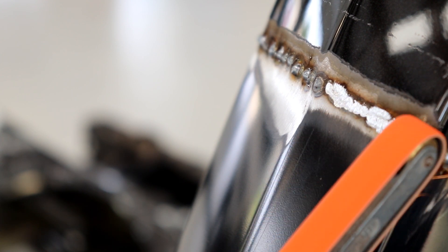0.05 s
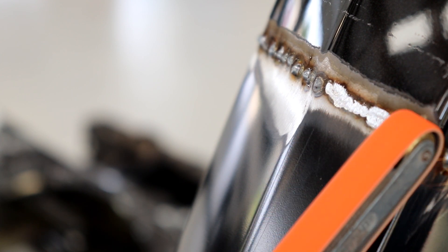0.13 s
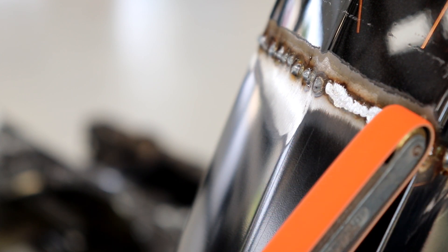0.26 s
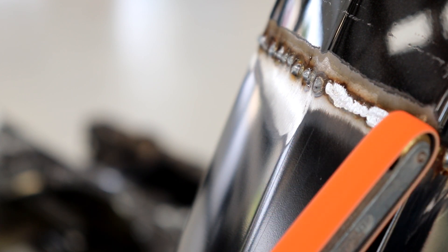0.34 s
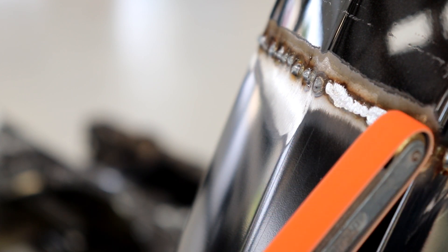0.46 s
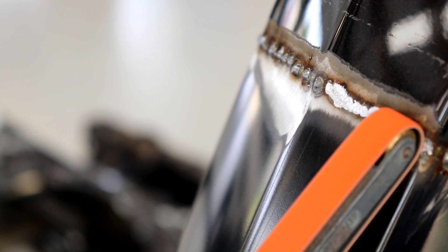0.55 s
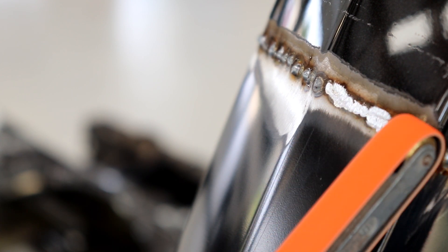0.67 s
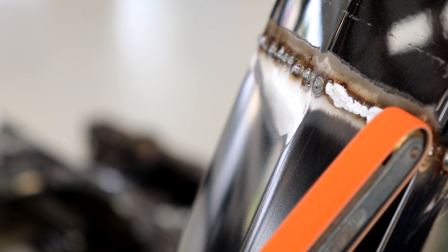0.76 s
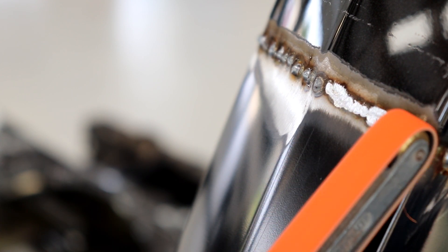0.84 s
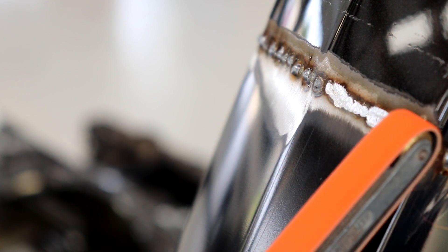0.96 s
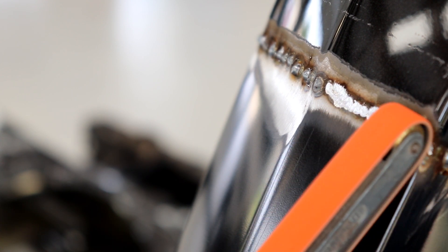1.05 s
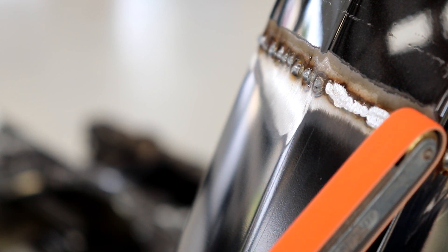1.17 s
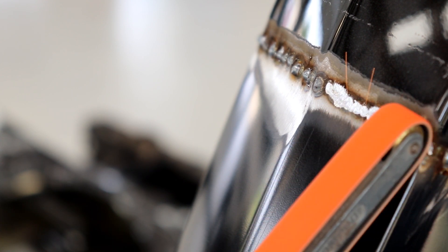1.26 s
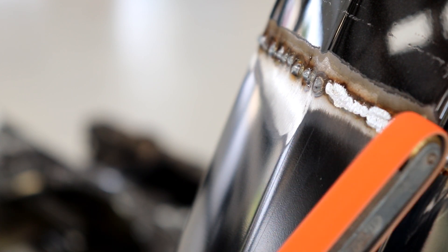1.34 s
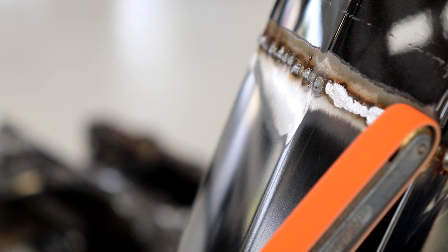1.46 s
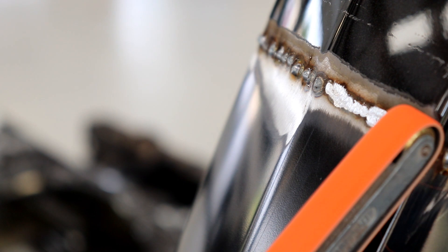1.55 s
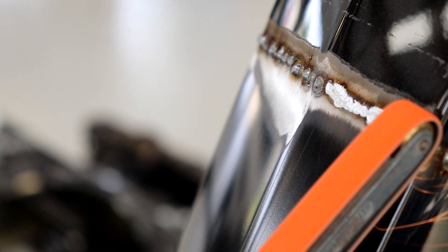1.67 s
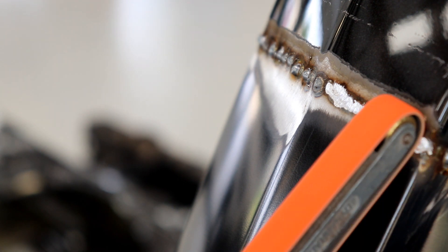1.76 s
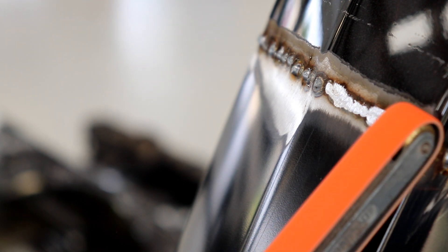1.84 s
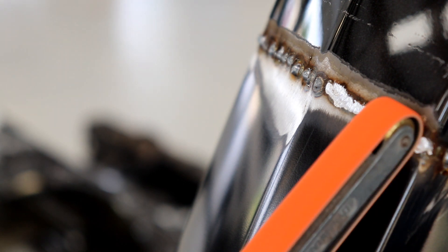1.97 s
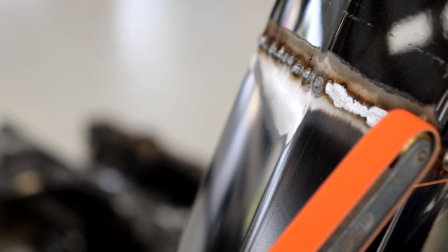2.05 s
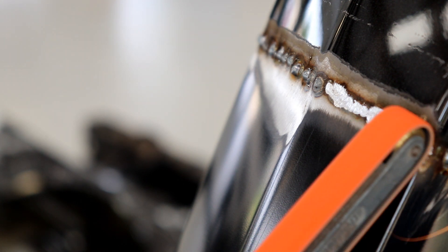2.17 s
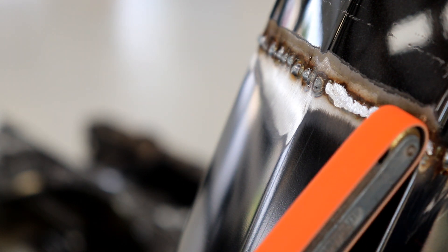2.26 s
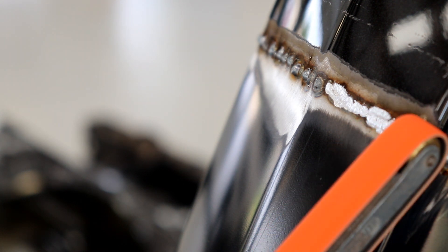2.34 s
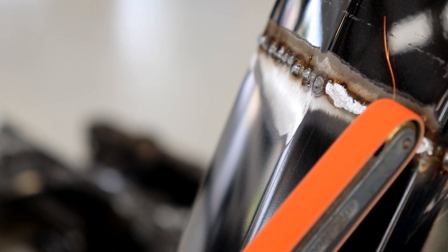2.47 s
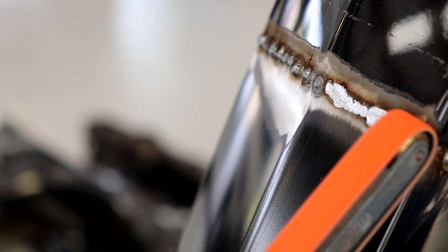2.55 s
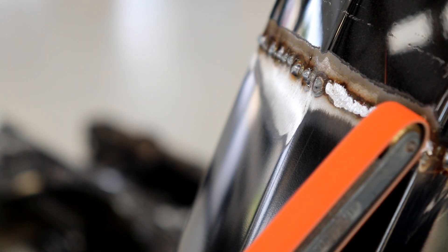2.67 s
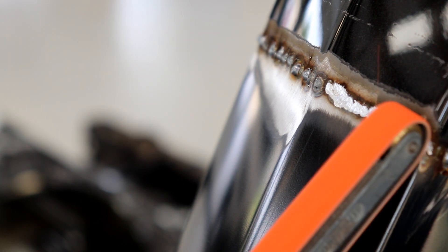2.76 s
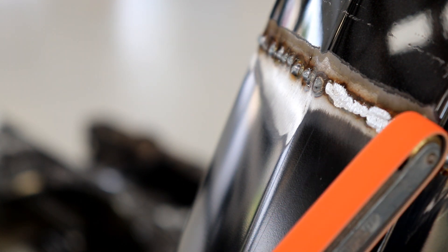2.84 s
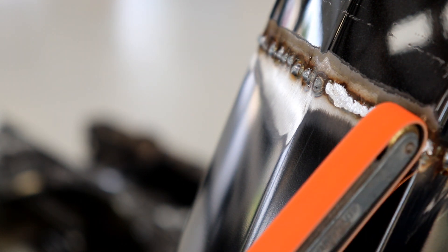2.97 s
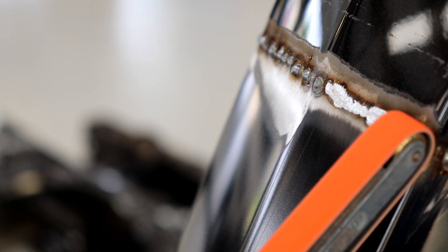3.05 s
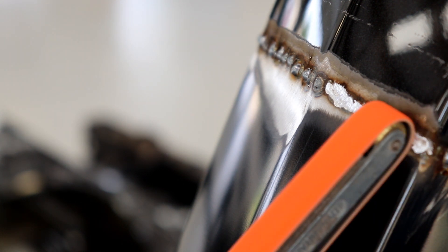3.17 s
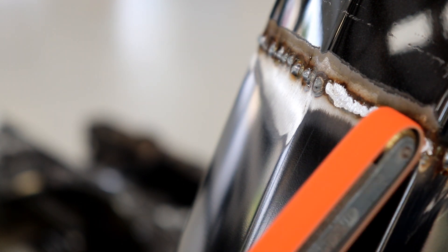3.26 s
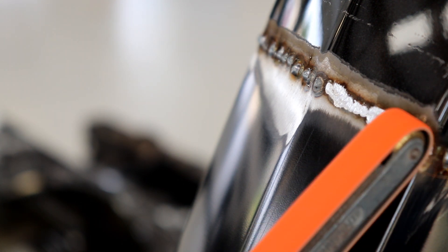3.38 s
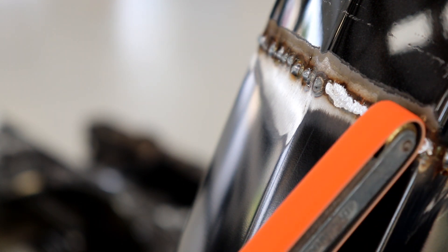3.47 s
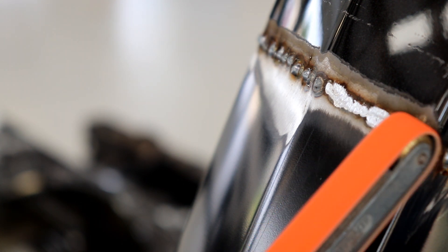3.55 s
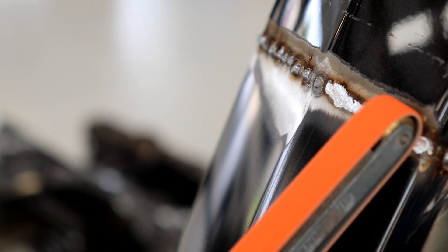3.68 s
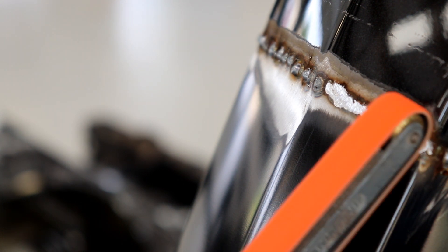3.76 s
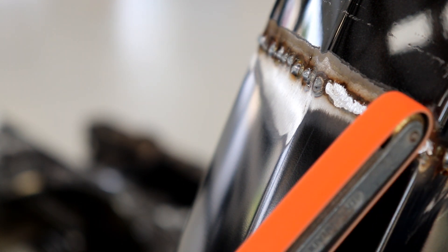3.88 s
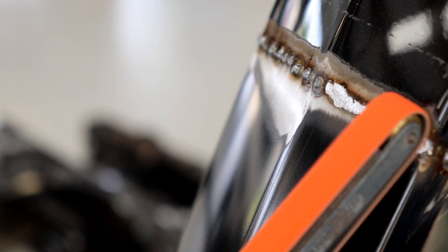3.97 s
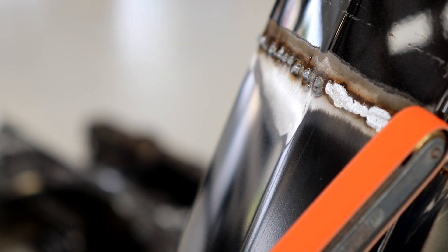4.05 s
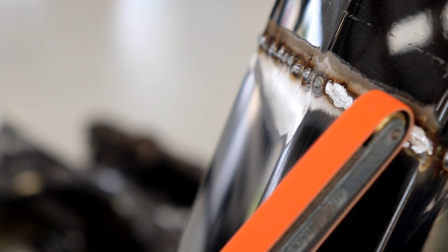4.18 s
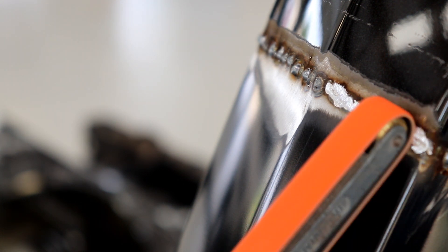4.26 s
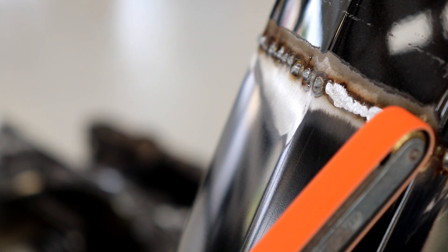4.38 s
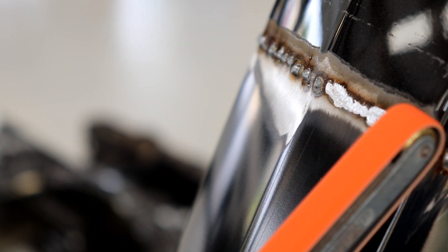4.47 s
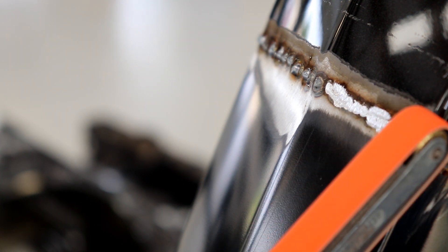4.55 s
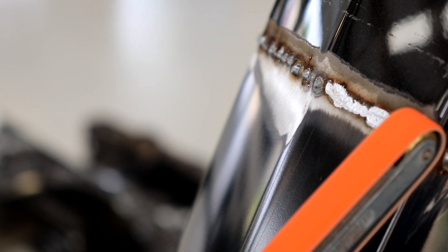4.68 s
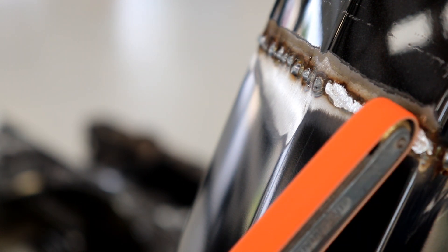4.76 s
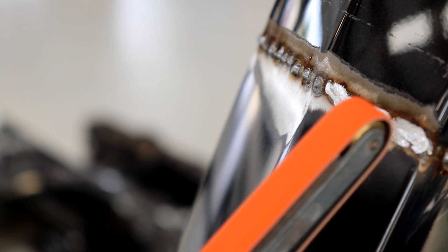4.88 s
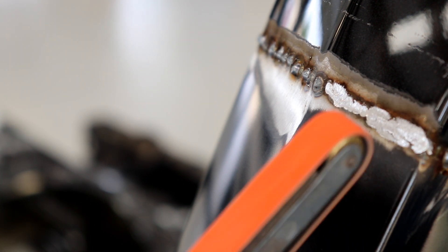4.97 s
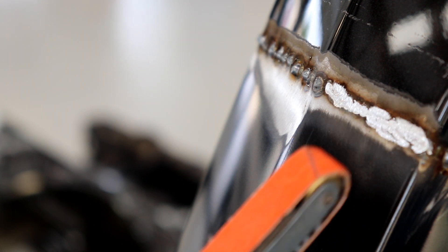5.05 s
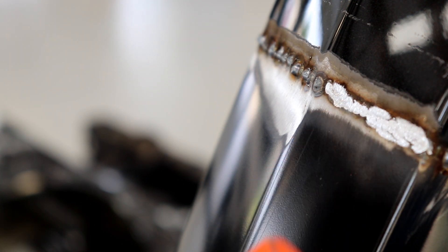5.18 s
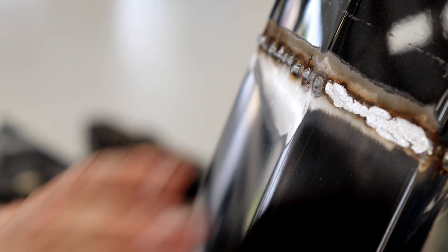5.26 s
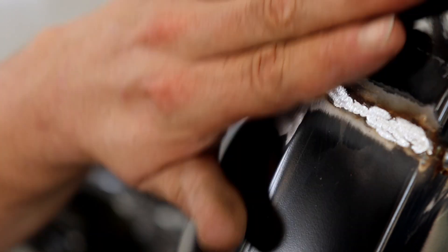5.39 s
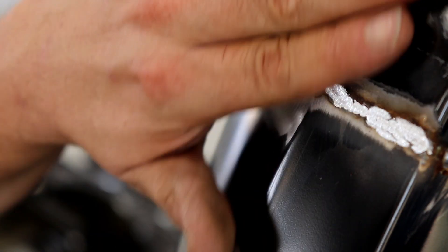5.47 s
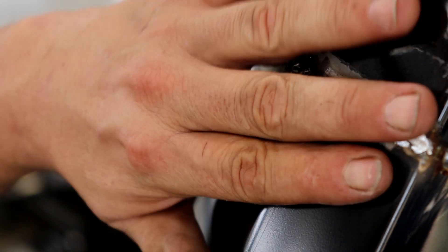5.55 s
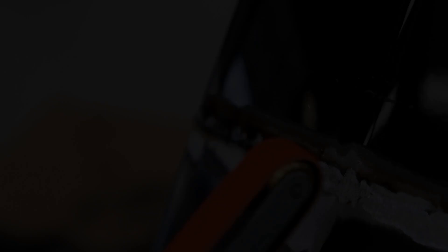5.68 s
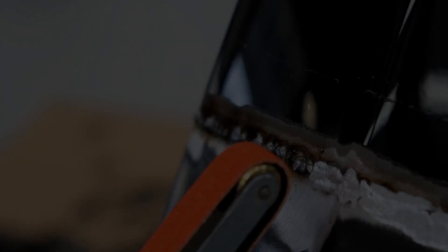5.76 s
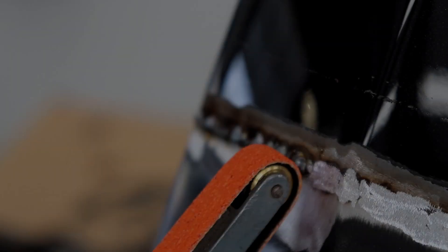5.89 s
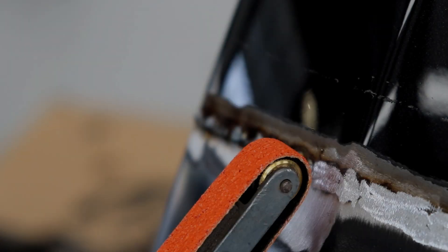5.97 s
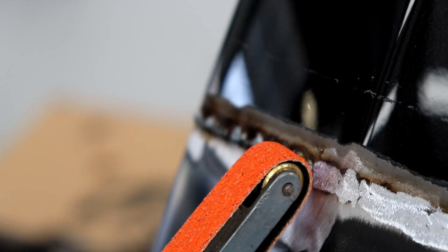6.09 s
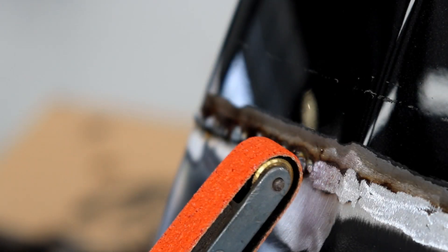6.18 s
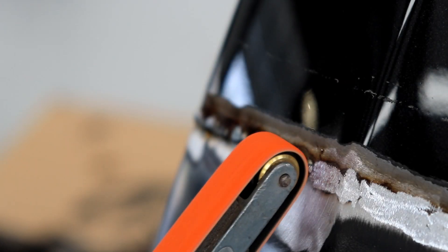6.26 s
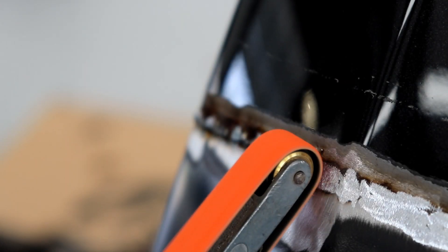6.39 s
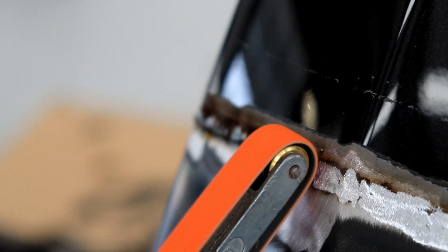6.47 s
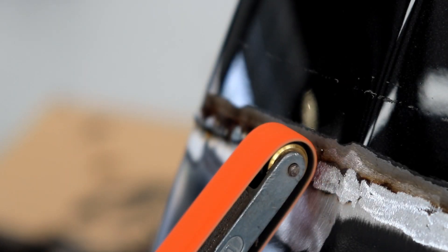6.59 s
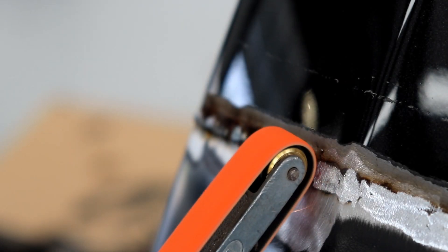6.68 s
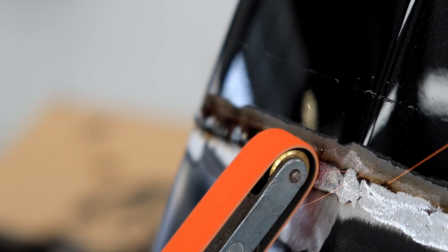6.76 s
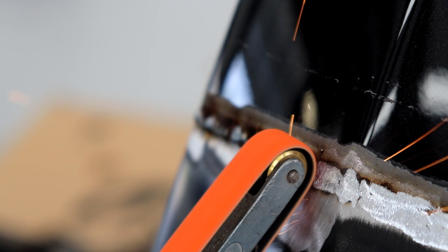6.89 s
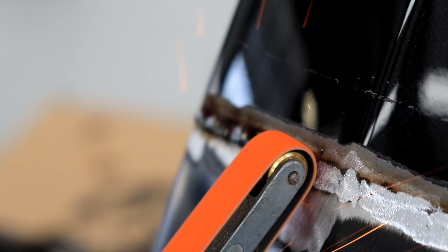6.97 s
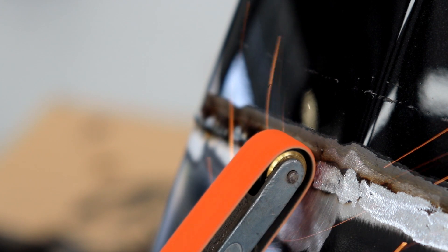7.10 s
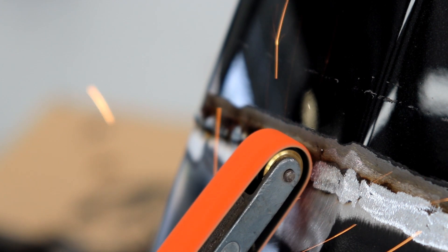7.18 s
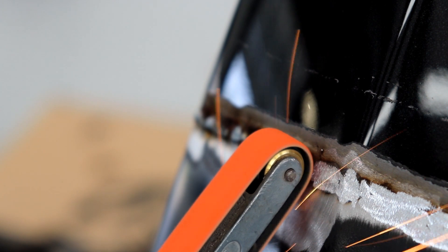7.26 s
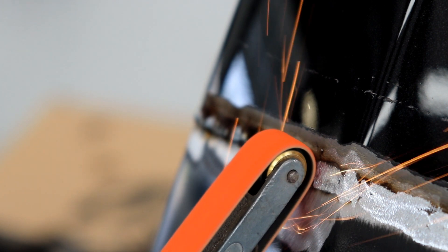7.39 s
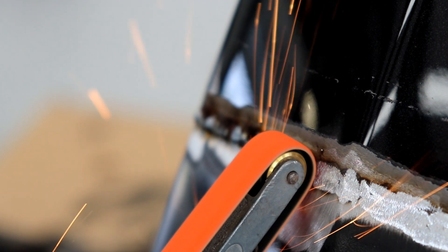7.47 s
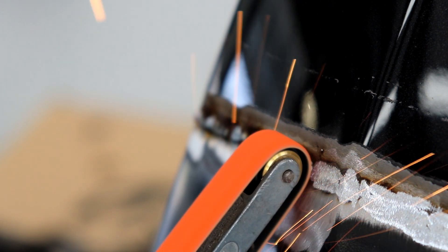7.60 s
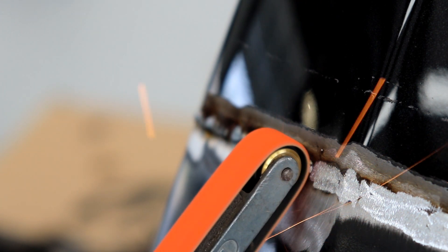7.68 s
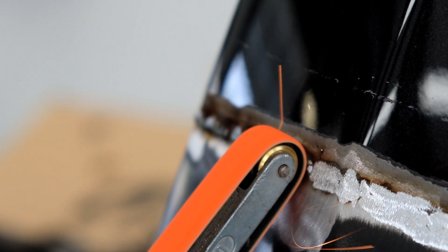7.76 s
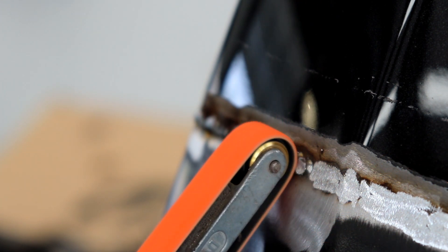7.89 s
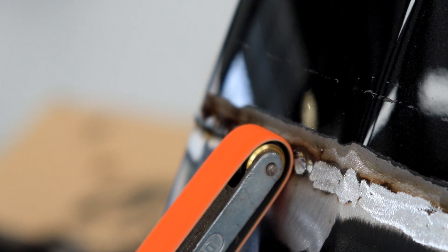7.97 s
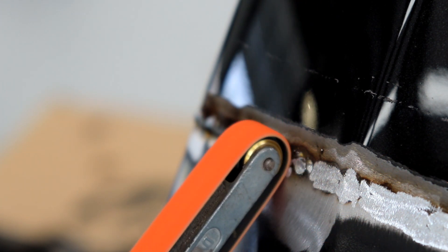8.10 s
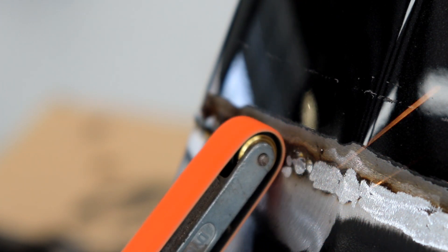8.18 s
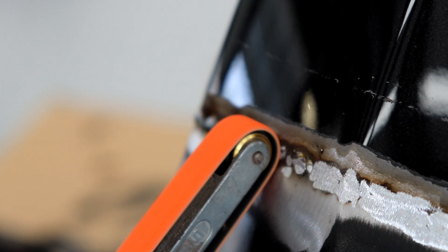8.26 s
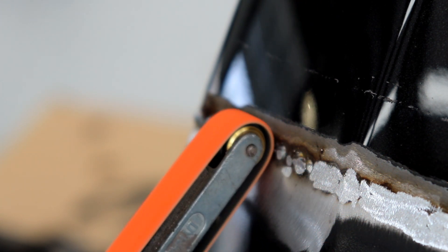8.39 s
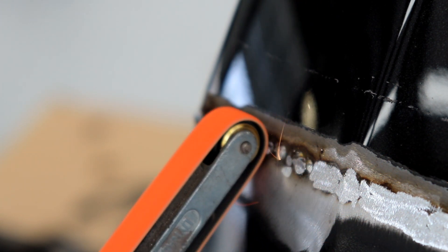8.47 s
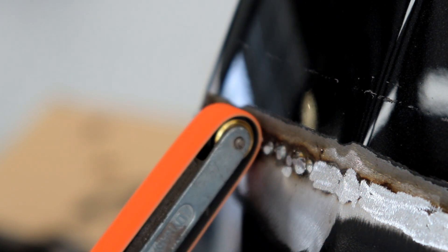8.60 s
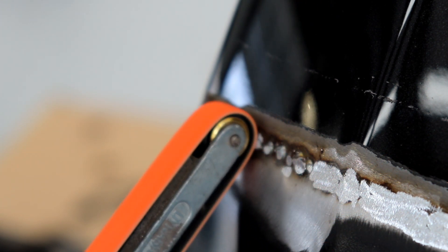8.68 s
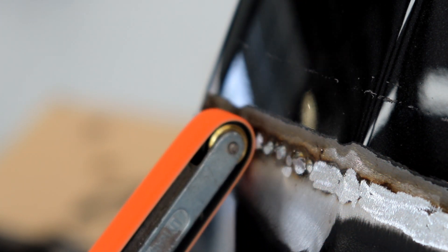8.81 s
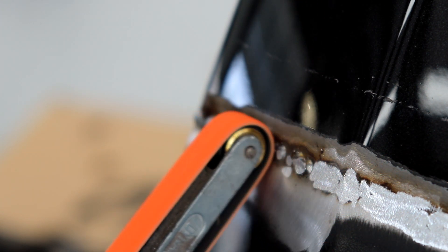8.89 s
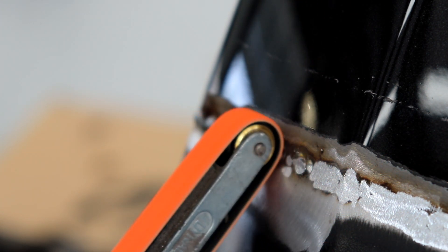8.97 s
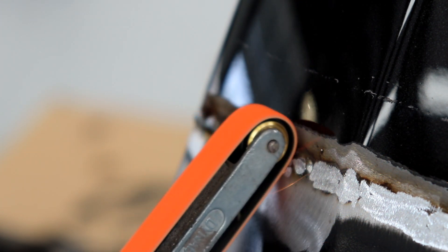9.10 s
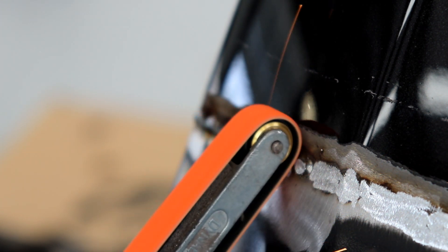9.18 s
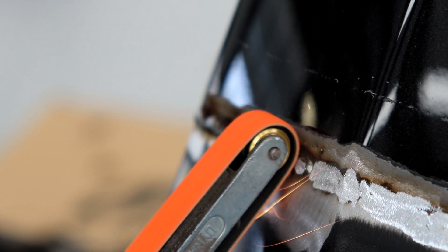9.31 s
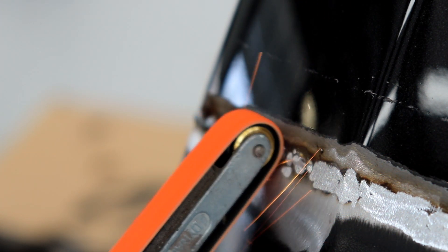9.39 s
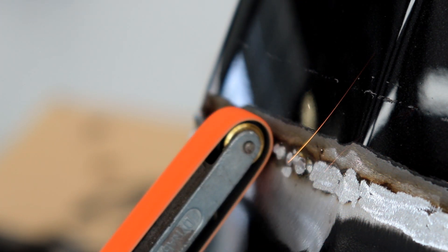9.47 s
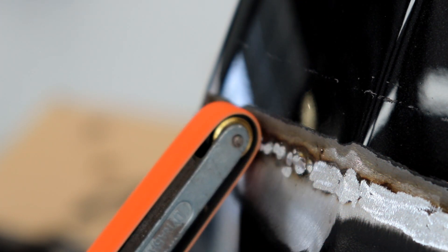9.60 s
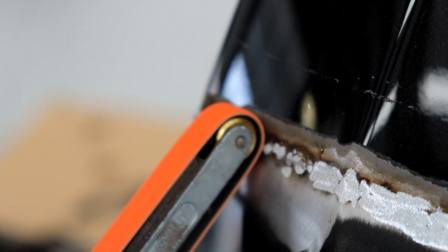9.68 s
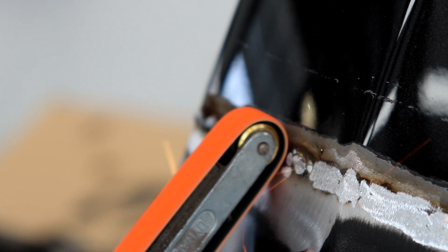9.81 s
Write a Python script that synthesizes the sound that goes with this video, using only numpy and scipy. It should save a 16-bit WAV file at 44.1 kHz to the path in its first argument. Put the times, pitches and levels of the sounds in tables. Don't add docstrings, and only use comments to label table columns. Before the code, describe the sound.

A handheld air belt sander whines and hisses on a weld, winds down, pauses amid faint hum and rustle, then restarts grinding.

```python
import sys
import numpy as np
from scipy import signal
from scipy.io import wavfile
from scipy.ndimage import uniform_filter1d

SR = 44100
rng = np.random.default_rng(int(sys.argv[2]) if len(sys.argv) > 2 else 0)


def invert_db(x):
    u = np.asarray(x, float) / 20
    return 10 ** u


def wrap_up_sound(samples):
    columns = np.atleast_2d(samples).T
    tamed = np.clip(columns, -1, 1)
    steps = np.round(tamed * 32767).astype(np.int16)
    wavfile.write(sys.argv[1], SR, steps)


N = 433926

# t/s, speed/(turns per s)
ROTOR_SPEED_1 = [(0, 288), (.17, 288.5), (.35, 279), (.45, 278.5), (.5, 281.5), (.85, 284.5), (1.3, 282.3),
                 (1.7, 285), (2.3, 286.5), (2.55, 283.5), (2.8, 286), (3.1, 284.5), (3.5, 288.5),
                 (4.25, 287.3), (4.4, 297), (4.76, 297.3), (4.82, 291), (4.88, 295.5)]
ROTOR_SPEED_2 = [(6.35, 28), (6.365, 40), (6.446, 147), (6.5, 196), (6.55, 229), (6.6, 247.5), (6.7, 261),
                 (6.82, 271), (7.08, 274), (7.22, 286.5), (7.5, 286), (7.78, 280.8), (8, 288.5),
                 (8.26, 292.5), (8.95, 289.5), (9.22, 284.5), (9.4, 285.5), (9.58, 283)]
# order/(multiple of rotor speed), level/dB rms
GRINDING_ORDERS = [(1.386, -35), (2.001, -48.5), (3.51, -42), (3.74, -42), (3.993, -44.5), (4.36, -37.5),
                   (4.987, -42), (5.364, -43.5), (6.001, -37), (6.191, -65), (6.931, -58), (7.389, -54),
                   (7.999, -36.5), (8.1, -42.5), (8.354, -40), (8.728, -40), (9.343, -37.5), (9.723, -44),
                   (11.997, -38), (13.0, -43), (18.001, -28), (19.995, -40), (24.0, -37), (36.966, -45)]
FREE_ORDERS = [(1.307, -64), (1.393, -47), (2.003, -46.5), (2.666, -45), (3.748, -42), (4.37, -36.5),
               (4.99, -48), (5.365, -45), (6.011, -41.5), (7.738, -44), (8.006, -46), (8.091, -34),
               (8.724, -38), (9.345, -44), (9.725, -39), (12.011, -38), (12.084, -48), (13.013, -46),
               (16.996, -44), (18.005, -24), (18.133, -41), (20.096, -45), (23.988, -46), (30.008, -48),
               (35.996, -50), (50.568, -56), (51.962, -57), (53.075, -57), (53.314, -61)]
SECOND_ORDERS = [(0.899, -56.5), (1.046, -46.5), (1.187, -52), (1.386, -36), (2.43, -43.5), (2.769, -45),
                 (3.33, -37.5), (3.496, -42.5), (3.737, -43.5), (4.363, -34.5), (4.987, -38.5),
                 (6.0, -31.5), (6.94, -36.5), (7.243, -43), (7.404, -38), (7.543, -39.5), (8.34, -37),
                 (8.72, -35), (9.357, -45), (9.517, -37), (9.718, -41.5), (11.765, -44), (11.996, -29),
                 (13.139, -49), (14.811, -43), (18.001, -31), (23.983, -37.5), (24.977, -51), (29.927, -56),
                 (29.994, -32.5)]
# t/s, free-running share/1
LIFT_OFF = [
    (4.33, 0),
    (4.36, 1),
]
# f/Hz, density/(dB per Hz)
AIR_COLOUR_1 = [(60, -32), (300, -28.5), (850, -4.5), (1300, -12.5), (2100, -9), (2550, -1), (3500, -7),
                (4500, -6), (5250, -1), (6500, -6.5), (8600, -2.5), (10500, -14.5), (14000, -9),
                (15500, -18.5)]
AIR_COLOUR_2 = [(60, -50), (200, -40), (850, -1), (1300, -2.5), (2100, -4), (2600, -1.5), (3350, 3),
                (4500, -2), (5250, 1.5), (6500, -4), (8600, 2), (10500, -12.5), (14000, -9.5),
                (15500, -12.5)]
# f/Hz, density/(dB per Hz)
GRIT_COLOUR_1 = [(150, -32), (240, 1), (600, 0), (1050, -4), (1500, 3.5), (2300, -8.5), (4000, -7.5),
                 (13000, -7)]
GRIT_COLOUR_2 = [(150, -41), (280, -24), (600, 2), (1100, 0.5), (2000, 2.5), (3300, -1), (5000, -2),
                 (15000, -5)]
# f/Hz, width/Hz, level/dB
HOUSING_MODES = [(3980, 75, 3), (7400, 840, -2), (9770, 260, 5), (11300, 320, 5), (12500, 340, -0.5)]
SHEET_MODES = [(950, 28, 7.5), (2140, 34, 5.5), (2650, 70, 7.5), (3380, 93, 11), (3830, 40, 6.5),
               (4530, 50, 2)]
# t/s, speed swing/(turns per s)
SAWING_SWING = [
    (.45, 0),
    (.55, 1.8),
    (2, 1.7),
    (2.6, .7),
    (4.1, 1),
    (4.25, 0),
]
# start t/s, end t/s, knock level at start/dB, at end/dB
ROLLER_LEANS = [(0, .37, -41, -23), (0.356, 0.546, -18.5, -27), (0.565, .89, -27.5, -32),
                (0.913, .99, -27, -38), (1.03, 1.487, -27.5, -27.5), (1.54, 2.61, -35, -31),
                (2.64, 3.073, -29, -31.5), (3.12, 3.735, -34, -34), (3.74, 4.34, -37.5, -33.5),
                (4.778, 4.87, -28, -36), (6.52, 6.734, -36, -34), (6.762, 6.866, -33, -32),
                (6.89, 7.225, -38, -30), (7.248, 7.5, -30, -39), (7.5, 7.89, -36, -32),
                (7.95, 8.21, -40, -31), (8.2, 9.14, -32.5, -34), (9.16, 9.71, -40, -39),
                (9.752, 9.86, -35, -30)]
# centre t/s, half length/s, level/dB
ROLLER_RATTLES = [
    (0.36, .06, -37),
    (7.787, 0.099, -26.5),
    (8.66, 0.058, -33),
    (9.11, 0.086, -31),
    (9.76, .1, -26.5),
]
# t/s, air hiss level/dB, grinding contact level/dB
RESTART = [
    (6.32, -41, -46),
    (6.34, -22.5, -32),
    (6.43, -37, -22),
    (6.45, -25, -21),
    (6.46, -20, -19.5),
    (6.48, -26.5, -22),
    (6.69, -21, -23.5),
    (7.3, -23.5, -23.5),
    (9.84, -22.5, -26.5),
]
# heard from t/s, valve shut t/s, full-speed level/dB, swell/s, gain ceiling/dB
RUN_DOWNS = [
    (4.918, 4.9, -10.3, .019, -11),
    (5.7075, 5.6125, -2, .001, -14),
]
# t/s, level/dB, share ringing in the exhaust/1
START_PUFFS = [
    (6.338, -25, .3),
    (6.352, -18.5, .05),
    (6.367, -14, .2),
    (6.423, -13.5, .8),
    (6.446, -19, .6),
    (6.5, -18.5, .7),
    (6.605, -18, .8),
    (6.625, -27, .8),
    (6.9, -41, .8),
]
PUFF_PHASES = [
    (-1, 0),
    (-1, -.68),
    (1, -.55),
]
# t/s, level/dB
VALVE_RUSH = [
    (6.324, -40),
    (6.33, -25),
    (6.336, -31),
    (6.345, -20),
    (6.36, -22),
]
# t/s, rise/s, fall/s, bright level/dB, low level/dB
HAND_STROKES = [
    (5.19, 0.046, 0.13, -36, -46),
    (5.434, .008, .05, -36.5, -41),
    (5.612, 0.021, 0.049, -36, -34.5),
    (5.713, .004, 0.04, -25, -35),
    (5.876, 0.038, 0.11, -40, -44),
]
# f/Hz, density/(dB per Hz)
HAND_COLOUR = [(1060, -27), (1800, -2.5), (2910, -2), (3150, -4), (4400, -8), (5180, -5), (5570, -7),
               (8830, -6), (12600, -16), (15600, -30)]
SHOP_WASH = [(15, -52), (25, -32), (146, -6.5), (209, -8), (312, -7), (413, -12.5), (485, -14.5),
             (668, -10.5), (800, -8.5), (1220, -17.5), (3000, -48), (3900, -73), (6600, -120)]
# f/Hz, width/Hz, level/dB
DISTANT_HUM = [
    (217.7, 4.2, -41),
    (403, 26, -37),
    (765, 92, -46.5),
]
# from t/s, initial deficit/dB, settled level/dB
GAIN_RECOVERIES = [
    (4.98, -19, -26.5),
    (5.705, -3, -29.5),
]

VANES = 4
ROLLER = 1.386
BELT_LAP = .26
SHUT_S = 4.915
CALM_DB = -50


def first_pass():
    t = grid(0, SHUT_S + 0.2)
    knock = knocking(t)
    shut = np.maximum(t - SHUT_S, 0)
    air_db = -21.5 - 4 * np.minimum(shut / 0.011, 1) - 135 * shut
    grit_db = -37 + 0.69 * (knock[:, 2] - CALM_DB)
    grit_db = grit_db - 200 * np.maximum(t - SHUT_S + 0.099, 0)
    rows = np.transpose([t, air_db, grit_db])
    return sander(rows, ROTOR_SPEED_1, knock[t < SHUT_S], AIR_COLOUR_1, GRIT_COLOUR_1, 2.6, first_lines)


def second_pass():
    t = grid(RESTART[0][0], RESTART[-1][0])
    knock = knocking(t)
    air_db, grit_db = columns(RESTART, t)
    grit_db = grit_db + 0.098 * (knock[:, 2] - CALM_DB)
    rows = np.transpose([t, air_db, grit_db])
    return sander(rows, ROTOR_SPEED_2, knock, AIR_COLOUR_2, GRIT_COLOUR_2, 1.18, second_lines)


def sander(rows, speed, knock, air, grit, grit_gain_db, lines):
    t = np.arange(rows[0][0], rows[-1][0], 1 / SR)
    air_db, grit_db = columns(rows, t)
    ease_s, stroke_s, hand_wobble = .53, .2355, .25
    saw = columns(SAWING_SWING, t)[0] * np.cos(2 * np.pi * (t - ease_s) / stroke_s)
    turns = np.cumsum(columns(speed, t)[0] + saw + hand_wobble * drift(len(t), 8.)) / SR
    beat = 1 + 0.055 * np.cos(2 * np.pi * turns)
    beat += 0.086 * np.cos(2 * np.pi * VANES * turns)
    beat += 0.017 * np.cos(2 * np.pi * BELT_LAP * turns)
    flicker_db = 0.62 * drift(len(t), 16.) + .5 * drift(len(t), 300.)
    hiss = invert_db(air_db + 3.0 + flicker_db) * beat * noise(air, len(t), 0.8, HOUSING_MODES)
    grain_db = 0.97 * drift(len(t), 120.) + 1.3 * drift(len(t), 900.)
    scrape = invert_db(grit_db + grit_gain_db + grain_db) * noise(grit, len(t), 2.5, SHEET_MODES)
    tones = np.zeros(len(t))
    for orders, share, *levels in lines(t):
        on = share > 0
        tones[on] += share[on] * whine(orders, turns[on], *levels)
    return rows[0][0], hiss + scrape + tones + roller(knock, t, turns)


def whine(orders, turns, low_db, high_db, steady_db, flutter_per_s):
    out = np.zeros(len(turns))
    for k, db in orders:
        if min(abs(k - ROLLER), abs(k - 2 * ROLLER)) < .02:
            continue
        waver_db = steady_db if abs(k - round(k)) < .02 else 2.5
        level_db = db + (low_db if k < 10 else high_db * k / 12)
        level_db = level_db + waver_db * drift(len(turns), flutter_per_s)
        wobble = 0.034 * (1 + k * flutter_per_s / 1600) * drift(len(turns), 60.) + rng.random()
        out += np.sqrt(2) * invert_db(level_db) * np.sin(2 * np.pi * (k * turns + wobble))
    return out


def first_lines(t):
    free = columns(LIFT_OFF, t)[0]
    running = np.interp(t, [4.91, 4.924], [1, 0])
    loaded_part = (GRINDING_ORDERS, np.sqrt(1 - free), 1.5, 1.7, 1.3, 30.)
    free_part = (FREE_ORDERS, np.sqrt(free) * running, 1.5, 1.5, 1.3, 30.)
    return loaded_part, free_part


def second_lines(t):
    working_speed = 288
    slow_db = 20 * np.log10(working_speed / columns(ROTOR_SPEED_2, t)[0])
    low_db = -6 * np.clip(slow_db - .4, 0, 8)
    high_db = -24 * np.tanh(np.maximum(slow_db - .15, 0) / .8)
    return [(SECOND_ORDERS, np.ones(len(t)), low_db, high_db, 2.4, 100.)]


def roller(rows, t, turns):
    once_db, twice_db = columns(rows, t)
    angle = 2 * np.pi * (ROLLER * turns + 0.038 * drift(len(t), 40.))
    shake = invert_db(1.8 * drift(len(t), 45.))
    once = invert_db(once_db - 2.0) * np.sin(angle)
    twice = invert_db(twice_db - 3.5) * np.sin(2 * angle)
    return np.sqrt(2) * shake * (once + twice) * (t < rows[-1][0])


def knocking(t):
    once = 1e-7
    for start, end, from_db, to_db in ROLLER_LEANS:
        held = np.clip(np.minimum(t - start, end - t) / 0.042 + .5, 0, 1)
        once = once + held ** 2 * invert_db(2 * np.interp(t, [start, end], [from_db, to_db]))
    twice = invert_db(2 * CALM_DB)
    for centre, half, db in ROLLER_RATTLES:
        twice = twice + invert_db(2 * db) * np.exp(-((t - centre) / half) ** 2)
    return np.transpose([t, 10 * np.log10(once), 10 * np.log10(twice)])


def puffs(rows, sign, first_cycle):
    t = np.arange(rows[0][0], rows[-1][0], 1 / SR)
    hz, db, ring = columns(rows, t)
    ring = np.clip(ring, 0, 1)
    cycles = first_cycle + np.cumsum(hz) / SR
    k = np.arange(1, 17)[:, None]
    muffle_hz, rumble_cut_hz = 1000, 170
    muffler = 1 / np.sqrt((1 + (k * hz / muffle_hz) ** 22) * (1 + (rumble_cut_hz / (k * hz)) ** 3))
    pipe = muffler * (1 - ring + 2.5 * ring * mode(k * hz, 900, 240))
    leak_hz, leak_width, leak_db = 1920, 800, -17
    open_width = leak_width / 2 * (1 + 1.6 * ring)
    leak_band = np.exp(-((k * hz - leak_hz) / open_width) ** 4)
    leak = (7.5 * ring ** 2 - 1) * invert_db(leak_db) * leak_band / (k / 2) ** 2
    response = pipe + leak
    sound = (response * np.exp(2j * np.pi * k * cycles)).real.sum(0)
    sound = sound / np.sqrt((abs(response) ** 2).sum(0) / 2)
    throb_db = 5 * ring * np.cos(np.pi / 2 * BELT_LAP * cycles) * (hz > 600)
    uneven_db = .6 * np.cos(np.pi / 2 * cycles) + .6 * drift(len(t), 110.)
    onset = np.minimum(np.arange(len(t)) / 30, 1)
    return rows[0][0], sign * invert_db(db + throb_db + uneven_db) * sound * onset


def rundown(heard, shut, db, swell, ceiling_db):
    t = grid(heard, shut + .175)
    full_hz, half_speed_s = 1180, .07
    hz = full_hz / (1 + ((t - shut) / half_speed_s) ** 2.45)
    level_db = np.minimum(db - 7.8 * np.log(full_hz / hz) ** 1.6, ceiling_db)
    level_db = level_db + 40 * np.log10(np.clip((t - heard) / swell, .2, 1))
    ring = .1 * np.clip(hz / 200 - 3, 0, 1)
    return np.transpose([t, hz, level_db, ring])


def spin_up():
    t = grid(START_PUFFS[0][0], START_PUFFS[-1][0])
    db, ring = columns(START_PUFFS, t)
    return np.transpose([t, VANES * columns(ROTOR_SPEED_2, t)[0], db, ring])


def valve():
    t = np.arange(VALVE_RUSH[0][0], VALVE_RUSH[-1][0], 1 / SR)
    rush = resonate(rng.standard_normal(len(t)), 870, 400)
    return VALVE_RUSH[0][0], invert_db(columns(VALVE_RUSH, t)[0]) * evened(rush)


def rustle():
    t = np.arange(5.04, 6.35, 1 / SR)
    bright_gain, low_gain = invert_db(-41), invert_db(-42.5)
    for s, rise, fall, bright_db, low_db in HAND_STROKES:
        stroke = np.exp(-np.where(t < s, ((s - t) / rise) ** 2, (t - s) / fall))
        bright_gain = np.hypot(bright_gain, invert_db(bright_db) * stroke)
        low_gain = np.hypot(low_gain, invert_db(low_db) * stroke)
    grain = invert_db(0.45 * drift(len(t), 250.))
    bright = noise([(1200, -30)] + HAND_COLOUR, len(t), 2.5)
    low = noise([(700, -19), (1200, -1), (2000, -8), (2600, -21.5)], len(t), 3.5)
    low_gain = low_gain * np.minimum((t - t[0]) / 0.13, 1)
    brushed = bright_gain * bright + invert_db(1.0) * low_gain * low
    return t[0], grain * brushed * signal.windows.tukey(len(t), .04)


def shop():
    hum = np.zeros(N)
    for hz, width, db in DISTANT_HUM:
        hum += invert_db(db + 29.5) * evened(resonate(rng.standard_normal(N), hz, width))
    wash = noise(SHOP_WASH + [(6000, -37)], N, 3.0)
    t = np.arange(N) / SR
    ducked_db, duck_at_s, duck_s, recover_s = -51.5, 6.32, .04, 0.12
    db = np.full(N, ducked_db)
    for s, under_db, settled_db in GAIN_RECOVERIES:
        deficit = np.exp(-(np.maximum(t - s, 0) / recover_s) ** 1.2)
        db = np.where(t > s, settled_db + under_db * deficit, db)
    db = db + (ducked_db - db) * np.clip((t - duck_at_s) / duck_s, 0, 1)
    return invert_db(db) * (0.63 * wash + hum)


def noise(colour, count, patchy_db, modes=()):
    frames, hz = count // 256 + 5, np.fft.rfftfreq(1024, 1 / SR)
    a, b, patches = rng.standard_normal((frames, 513, 3)).T
    patches = uniform_filter1d(patches, size=10, axis=0)
    patches = evened(uniform_filter1d(patches, size=12, axis=1))
    shape_db = read(colour, hz)
    for f, width, db in modes:
        shape_db = shape_db + db * np.exp(-.5 * ((hz - f) / width) ** 2)
    z = (a + 1j * b) * invert_db(shape_db[:, None] + patchy_db * patches)
    return evened(signal.istft(z, nperseg=1024, noverlap=768)[1][:count])


def resonate(x, hz, width):
    r = np.exp(-np.pi * width / SR)
    gain = (1 - r * r) / 2
    return signal.lfilter([gain, 0, -gain], [1, -2 * r * np.cos(2 * np.pi * hz / SR), r * r], x)


def mode(hz, centre_hz, width):
    return 1 / (1 + 1j * (hz - centre_hz ** 2 / hz) / width)


def drift(count, per_s):
    knots = rng.standard_normal(int(count / SR * per_s) + 3)
    return evened(np.interp(np.arange(count) / SR * per_s, np.arange(len(knots)), knots))


def evened(x):
    return x / np.sqrt(np.mean(x ** 2) + 1e-20)


def read(points, hz):
    f, value = np.transpose(points)
    return np.interp(np.log(hz + 1), np.log(f + 1), value)


def columns(rows, t):
    s, *values = np.transpose(rows)
    return [np.interp(t, s, v) for v in values]


def grid(t0, t1):
    return np.arange(t0, t1, .001)


def add(mix, s, sound):
    part = mix[round(s * SR):][:len(sound)]
    part += sound[:len(part)]


def scene():
    mix = shop()
    add(mix, *first_pass())
    add(mix, *second_pass())
    trains = [rundown(*row) for row in RUN_DOWNS] + [spin_up()]
    for rows, start in zip(trains, PUFF_PHASES):
        add(mix, *puffs(rows, *start))
    add(mix, *valve())
    add(mix, *rustle())
    return np.array([mix, mix])


def band_limit(x):
    return signal.sosfilt(signal.butter(12, 15750, fs=SR, output="sos"), x)


def record(dry):
    return band_limit(dry)


dry = scene()
out = record(dry)
wrap_up_sound(out)
```